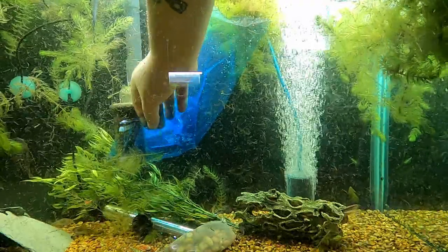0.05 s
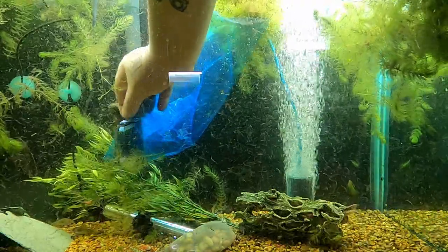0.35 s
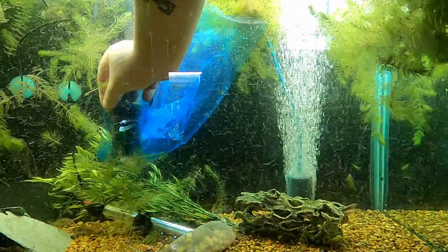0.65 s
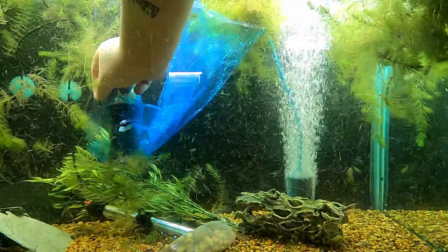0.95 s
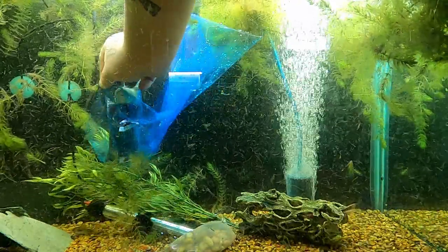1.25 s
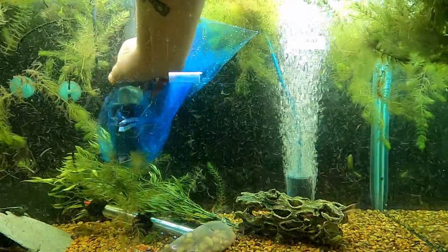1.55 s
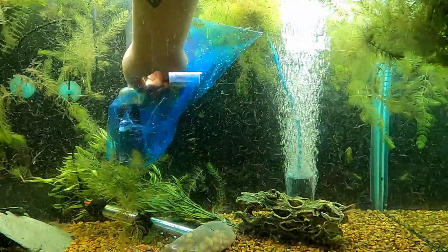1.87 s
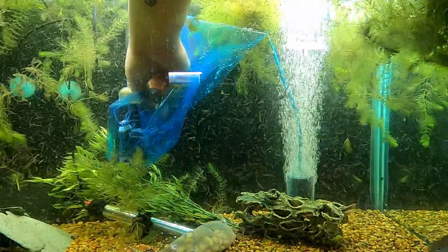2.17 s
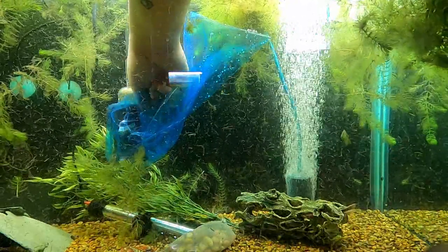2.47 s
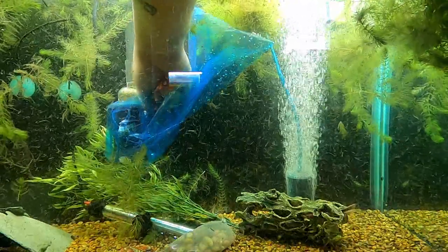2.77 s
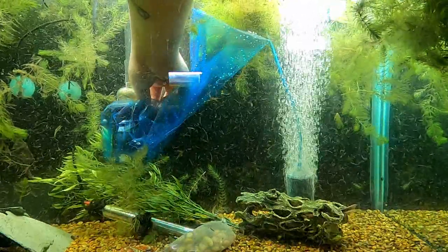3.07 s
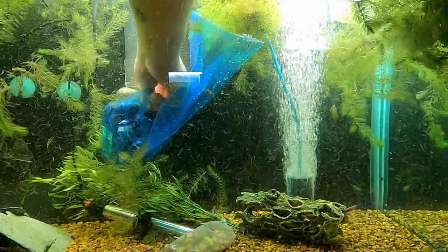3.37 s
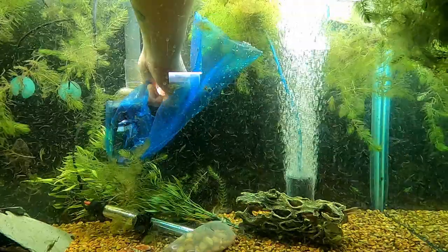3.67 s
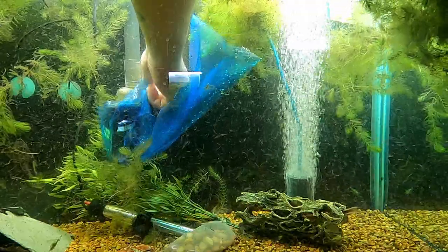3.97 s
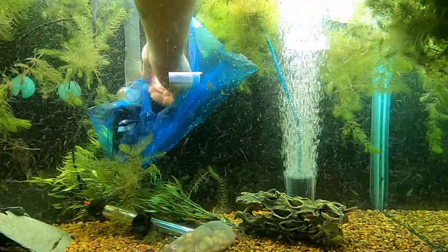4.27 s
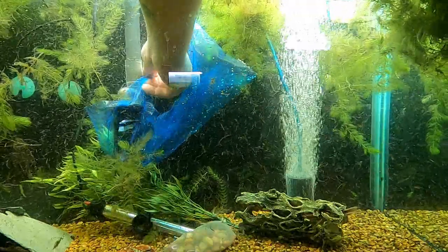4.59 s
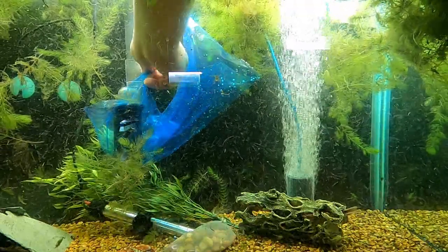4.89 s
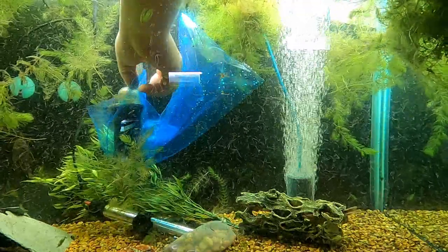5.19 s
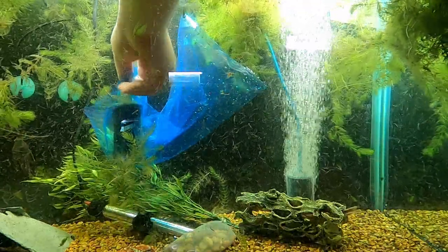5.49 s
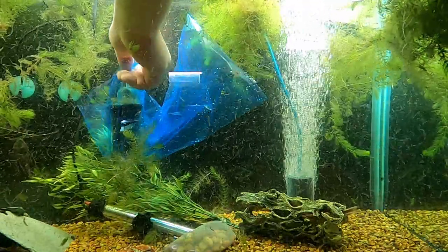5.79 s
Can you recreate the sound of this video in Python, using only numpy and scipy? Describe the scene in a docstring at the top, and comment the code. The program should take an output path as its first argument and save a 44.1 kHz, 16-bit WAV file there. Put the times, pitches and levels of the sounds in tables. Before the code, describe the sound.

An aquarium air stone bubbles steadily, rumbling and fizzing with small plinks, over a humming air pump and a few soft gurgles.

```python
"""Home aquarium in a small room

An air stone's column of bubbles rumbles in the tank and fizzes at the surface, where single bubbles
plink, films tick and little rafts collapse. The water gurgles softly around an arm moving in the tank.
Behind it a mains air pump buzzes, a slower motor throbs and the air line whistles faintly."""
import sys
import numpy as np
from scipy import signal
from scipy.fft import rfft, irfft, next_fast_len
from scipy.io import wavfile
from scipy.ndimage import map_coordinates

SR = 44100
rng = np.random.default_rng(int(sys.argv[2]) if len(sys.argv) > 2 else 0)


def master(y):
    """Save y as 16-bit WAV."""
    cut = np.clip(np.atleast_2d(y).T, -1, 1)
    pcm = np.round(cut * 32767)  # scale
    wavfile.write(sys.argv[1], SR, pcm.astype(np.int16))


N = 261954


def amp(db):
    """Decibels to gain."""
    return 10 ** (np.asarray(db) / 20)


def unit(x):
    """Scaled to rms 1."""
    return x / np.sqrt(np.mean(x ** 2) + 1e-20)


def along(curve, hz):
    """A curve of (freq_hz, value) points, read on a log frequency axis."""
    freqs, values = np.transpose(curve)
    return np.interp(np.log(hz + 1), np.log(freqs + 1), values)


def pan(pan_db):
    """Left and right gains for a level difference; positive is left."""
    return amp(np.multiply.outer([.5, -.5], np.atleast_1d(pan_db)))


def wobble(rate):
    """A smooth random curve, rate knots a second."""
    return map_coordinates(rng.standard_normal(int(N * rate / SR) + 4), [np.arange(N) * rate / SR])


def swell(peak_s, length_s):
    """A smooth hump from 0 to 1 and back."""
    return np.cos(np.pi * np.clip((np.arange(N) / SR - peak_s) / length_s, -.5, .5)) ** 2


def resonant(modes, hz):
    """Gain of (centre_hz, width_hz, level_db) resonances added in power."""
    return np.sqrt(sum(amp(2 * db) / (1 + ((hz - centre) / (0.67 * width)) ** 2) ** 2
                       for centre, width, db in modes))


def filtered(x, response):
    """x through an EQ given as gain against frequency."""
    size = next_fast_len(N + SR // 2)
    return irfft(rfft(x, size) * response(np.fft.rfftfreq(size, 1 / SR)), size)[..., :N]


def add(track, start_s, sound):
    """Mix a sound into a stereo track."""
    part = track[:, max(round(start_s * SR), 0):][:, :sound.shape[1]]
    part += sound[:, :part.shape[1]]


# How alike the tank sounds left and right: freq_hz, correlation
TANK_LIKENESS = [(40, 0.97), (250, 1), (600, 0.86), (1300, 0.75), (2800, 0.4), (6000, 0.17), (13000, 0.073)]
# Where each band of the tank sits, left minus right: freq_hz, pan_db
TANK_PAN = [(60, .5), (250, -0.5), (650, 2.5), (1300, 2.5), (2300, 3), (3900, 4.5), (5200, -1),
            (7700, -4.5), (9500, 4), (13000, 0)]

def placed(pair, colour):
    """Two unrelated signals, coloured and spread as the tank radiates: bass alike, treble apart."""
    def mid_side_gains(hz):
        angle = np.arccos(np.clip(along(TANK_LIKENESS, hz), -1, 1)) / 2
        return colour(hz) * np.array([np.cos(angle), np.sin(angle)])
    mid, side = filtered(pair, mid_side_gains)
    return unit(filtered(np.array([mid + side, mid - side]), lambda hz: pan(along(TANK_PAN, hz))))


def wash(colour):
    """A bed of coloured noise with the tank's stereo spread, rms 1."""
    return placed(rng.standard_normal((2, N)), colour)


# The small room's reverb time: freq_hz, t60_s
ROOM_DECAY = [(200, 0.17), (2000, 0.21), (12000, 0.11)]

def in_room(sound, pan_db, glass_db, room_db):
    """A sound with its own quick reflections from the glass and a room tail, in stereo."""
    hz, t, noise = signal.stft(rng.standard_normal((2, SR // 3)), SR, nperseg=256)
    tail = signal.istft(noise * amp(-60 * t / along(ROOM_DECAY, hz)[:, None]), SR, nperseg=256)[1]
    t = np.arange(tail.shape[1]) / SR
    glass = rng.standard_normal(tail.shape) * amp(-60 * t / 0.13) * (t > .002)
    path = amp(room_db) * tail / np.linalg.norm(tail[0])
    path += amp(glass_db) * glass / np.linalg.norm(glass[0])
    path[:, 0] += 1  # the direct sound
    return signal.fftconvolve(sound[None], path, axes=1) * pan(pan_db)


def ring(t, hz, t60, rise):
    """A bubble rings briefly, its pitch rising as it nears the surface."""
    tone = np.sin(2 * np.pi * hz * t * (1 + rise * t / t60))
    return tone * amp(-60 * t / t60) * (1 - np.exp(-t * hz / 2))


def spatter(t, hz, t60, count, spread, within_s):
    """A burst leaves small bubbles that ring just after it, scattered around its pitch."""
    delay, detune, strength = rng.random((count, 3)).T[:, :, None]
    since = np.maximum(t - within_s * delay, 0)
    pitches = hz * (1 + spread * (2 * detune - 1))
    return np.sum((.5 + .5 * strength) * ring(since, pitches, t60, rise=0.05), axis=0)


def swarm(rate, low_hz, high_hz, cycles, spread_db, samples=512):
    """Bubbles of random size and strength at random moments, rms 1."""
    when, pitch, strength = rng.random((int(rate * N / SR), 3)).T[:, :, None]
    hz = low_hz * (high_hz / low_hz) ** pitch
    gain = amp(-spread_db * np.log(1 - .98 * strength)) * hz
    grains = gain * ring(np.arange(samples) / SR, hz, cycles / hz, rise=.08)
    where = (when * N).astype(int) + np.arange(samples)
    return unit(np.bincount(where.ravel(), grains.ravel(), N)[:N])


def strays(rate, low_hz, high_hz, level_db, db_per_octave=-9, scatter_db=2.5):
    """Random cues (start_s, pitch_hz, level_db) for faint bubbles; the smaller, the weaker."""
    when, pitch, strength = rng.random((int(rate * N / SR), 3)).T
    octaves = pitch * np.log2(high_hz / low_hz)
    db = level_db + db_per_octave * (octaves - octaves.mean()) + scatter_db * (2 * strength - 1)
    return list(zip(when * N / SR, low_hz * 2 ** octaves, db))


def harmonics(partials, turns):
    """Sines at whole multiples of a rotation, each at its rms level and a random phase."""
    return sum(amp(db) * np.sqrt(2) * np.sin(2 * np.pi * (round(k) * turns + rng.random()))
               for k, db in partials)


def air_line(level_db=-75):
    """Air rushing through the tube rings in two narrow bands."""
    return amp(level_db) * wash(lambda hz: resonant([(3420, 80, -1), (3904, 70, 0)], hz))


# The slow motor's throb: harmonic, level_db
MOTOR_PARTIALS = [(1, -74), (3, -53.5), (4, -44), (6, -48.5), (8, -54), (9, -54), (12, -58), (13, -56.5)]

def motor(turn_hz=17.83):
    """A slow rotor throbs at multiples of its slightly drifting turning rate."""
    return harmonics(MOTOR_PARTIALS, turn_hz * np.arange(N) / SR + 0.013 * wobble(2.063))


# The pump's low mains hum: harmonic, level_db
PUMP_PARTIALS = [(1, -43.5), (2, -54), (3, -60), (4, -60.5), (5, -62.5), (8, -64.5), (10, -74.5),
                 (11, -74.5), (13, -85), (15, -83), (16, -77.5)]
# The housing resonances that voice its buzz: centre_hz, width_hz, level_db
HOUSING_MODES = [(1140, 40, -80), (1320, 200, -72.5), (2160, 50, -84), (2290, 50, -83.5), (2700, 30, -85),
                 (2890, 65, -74.5), (3240, 40, -82), (3385, 80, -77), (3565, 65, -74.5), (3715, 45, -76.5),
                 (3850, 50, -83), (3960, 40, -77.5), (4140, 40, -86), (6000, 1400, -96), (7800, 60, -94),
                 (8500, 120, -97), (9260, 200, -97), (10000, 90, -96)]

def pump(mains_hz=59.985):
    """The diaphragm strokes once per mains cycle: a hum, and a high buzz from the housing."""
    turns = mains_hz * np.arange(N) / SR
    hum = harmonics(PUMP_PARTIALS, turns)
    # the housing smears the push and the return over a few milliseconds, differently toward each side
    cycle = np.arange(2048) / 2048
    knock = amp(-18 * cycle) + 0.75 * amp(-18 * ((cycle - .5) % 1))
    rattle = rng.standard_normal((2, len(cycle))) + 1.08 * rng.standard_normal(len(cycle))
    lines = rfft(knock * rattle)
    hz = mains_hz * np.arange(lines.shape[1])
    lines = lines / abs(lines) * resonant(HOUSING_MODES, hz) * pan(along(TANK_PAN, hz))
    stroke = irfft(lines) * len(cycle) / np.sqrt(2)
    phase = turns + 0.00055 * wobble(3.01)
    buzz = np.array([np.interp(phase, cycle, side, period=1) for side in stroke])
    return hum + buzz


# Soft gurgles of large air pockets: start_s, pitch_hz, level_db, length_s, pan_db, warble_rad
AIR_POCKETS = [(2.905, 1238, -55.5, .05, 3, 0.67), (2.94, 1330, -58, 0.056, 3, .8),
               (4.137, 1430, -51.5, 0.075, 8, 0.51), (4.149, 289, -46, 0.05, 0, 1),
               (4.149, 379.4, -46, .06, 0, 1.3), (4.194, 1280, -55, .05, 4, 0.7),
               (4.287, 1280, -54, .04, 4, .8), (4.846, 700, -54, .07, -2, .4),
               (4.881, 605, -46, .052, 1, .35), (4.895, 806, -55.5, 0.057, 1, 1.1)]

def gurgles(rise=0.019):
    """Air pockets around the arm warble as they change shape and climb in pitch as they rise."""
    out, t = np.zeros((2, N)), np.arange(SR // 6) / SR
    for start_s, hz, db, length_s, pan_db, warble_rad in AIR_POCKETS:
        envelope = np.sin(np.pi * np.clip(t / length_s, 0, 1))
        warble = warble_rad * wobble(160)[:len(t)]
        tone = np.sin(2 * np.pi * hz * t * (1 + rise * t / length_s) + warble)
        add(out, start_s, in_room(amp(db) * envelope * tone, pan_db, glass_db=-7, room_db=-14))
    return out


PLINK_CYCLES, TICK_CYCLES = 68, 23.5  # periods to die away by 60 dB
BUBBLE_WIDTH = 0.58  # ticks and faint plinks take this share of the tank's pan at their pitch
# Sharp ticks of bursting films: start_s, pitch_hz, level_db
FILM_BURSTS = [(.306, 11500, -56), (.703, 11500, -64), (.91, 9000, -60), (1.084, 12000, -63),
               (1.51, 11800, -64), (1.768, 12100, -61), (1.936, 10100, -55.5), (2.108, 9000, -61),
               (2.512, 13200, -62.5), (2.635, 11200, -63), (2.7, 12200, -62), (2.796, 12000, -55),
               (2.998, 13500, -66), (3.112, 9650, -53.5), (3.523, 12300, -63), (4.41, 9400, -57),
               (4.426, 10300, -49), (4.429, 12000, -52), (4.774, 7100, -43), (4.915, 12500, -64),
               (5.534, 8300, -59)]

def ticks():
    """Bubble films snap with a bright, very short ring; fainter ones fall at random between them."""
    out, t = np.zeros((2, N)), np.arange(SR // 6) / SR
    faint = strays(rate=6, low_hz=7500, high_hz=13000, level_db=-65)
    for start_s, hz, db in list(FILM_BURSTS) + faint:
        t60 = TICK_CYCLES / hz
        tick = ring(t, hz, t60, rise=.05) + .5 * spatter(t, hz, t60, count=3, spread=.08, within_s=.012)
        pan_db = BUBBLE_WIDTH * along(TANK_PAN, hz)
        add(out, start_s, in_room(amp(db) * tick, pan_db, glass_db=5.5, room_db=6.5))
    return out


# The featured single bubbles: start_s, pitch_hz, level_db, pan_db
LOUD_PLINKS = [(.159, 2870, -47, 8), (.528, 4565, -52, -5), (.737, 6270, -54.5, 1), (.801, 2720, -52.5, -1),
               (.803, 4565, -53, -7), (.886, 1650, -49, 3), (.897, 6200, -49, -4), (.924, 5300, -52, -1),
               (.954, 3100, -52, 4), (.974, 6460, -52, -4), (.975, 3380, -48.5, 3), (.991, 3080, -49.5, 0),
               (1.119, 2780, -46.5, 4), (1.286, 1790, -42, 2), (1.296, 8000, -59.5, -6),
               (1.379, 7850, -60, -9), (1.668, 4390, -52, 5), (1.789, 2240, -53, 4), (2.219, 3100, -51, 3),
               (2.303, 4540, -49.5, -6), (2.451, 2420, -54, 4), (2.736, 1810, -48, -1),
               (2.768, 1720, -52, 1), (2.843, 3430, -45, 2), (2.854, 2760, -49, 3), (2.898, 6290, -56, -3),
               (3.104, 2260, -51, 2), (3.192, 3360, -49, 9), (3.255, 4350, -53, 0), (3.282, 6720, -56, -5),
               (3.844, 3500, -44.5, 2), (4.058, 7670, -55, -8), (4.25, 4300, -54, 3), (4.391, 2400, -52, 0),
               (4.455, 2160, -49.5, 2), (5.001, 7850, -60, -9), (5.055, 4000, -50, 0),
               (5.282, 4900, -50.5, 2), (5.295, 7000, -54, -5), (5.425, 5160, -50, 0),
               (5.579, 4280, -49, 3), (5.852, 3400, -48, 7)]

def plinks():
    """Single bubbles ring at the surface and leave a little spatter; faint strays fill the gaps."""
    out, t = np.zeros((2, N)), np.arange(SR // 6) / SR
    faint = [(start_s, hz, db, BUBBLE_WIDTH * along(TANK_PAN, hz))
             for start_s, hz, db in strays(rate=3.3, low_hz=2600, high_hz=7400, level_db=-62)]
    for start_s, hz, db, pan_db in list(LOUD_PLINKS) + faint:
        t60 = PLINK_CYCLES / hz
        plink = ring(t, hz, t60, rise=.06)
        plink += .32 * spatter(t, hz, t60 / 2, count=4, spread=.13, within_s=.035)
        add(out, start_s, in_room(amp(db) * plink, pan_db, glass_db=-4, room_db=-2))
    return out


# Rafts of small bubbles collapsing: start_s, pitch_hz, level_db, length_s, pan_db
RAFTS = [(0.887, 1600, -65, 0.034, 1), (.965, 7000, -74, 0.019, -6), (1.08, 4100, -66.5, 0.045, 3),
         (1.584, 4860, -71, .07, -1), (1.823, 2600, -68, 0.027, 7), (2.182, 3860, -67, .035, 4),
         (2.275, 5900, -71.5, 0.043, -3), (2.74, 1900, -67, .045, 2), (2.843, 3200, -67, 0.037, 3),
         (3.57, 5500, -75, .04, -2), (3.855, 880, -63, 0.023, 3), (3.858, 6000, -74, .025, -7),
         (4.115, 6650, -71, .025, -5), (4.144, 2750, -67, 0.065, 6), (4.15, 1390, -62.5, .065, 4),
         (4.397, 3500, -67, .05, 4), (4.775, 7250, -71, 0.011, -4), (4.995, 6400, -72, .012, -4),
         (5.04, 4100, -70, 0.036, 1), (5.278, 5100, -68, .025, 1), (5.422, 5300, -68, .012, 0),
         (5.53, 6200, -71, .015, -3), (5.575, 4200, -67, .035, 3)]

def splashes():
    """A raft of bubbles gives way: dozens pop within a few hundredths of a second."""
    out, t = np.zeros((2, N)), np.arange(SR // 6) / SR
    for start_s, hz, db, length_s, pan_db in RAFTS:
        pops = spatter(t, hz, TICK_CYCLES / hz, count=30, spread=0.19, within_s=length_s)
        pops = pops / np.linalg.norm(pops) * np.sqrt(length_s * SR)
        add(out, start_s, in_room(amp(db) * pops, pan_db, glass_db=-3, room_db=-1))
    return out


def froth(eq, grains, grain_db=-7):
    """Countless far bubbles merge into a wash; the nearer ones stand out as grains."""
    colour = lambda hz: amp(along(eq, hz))
    return unit(wash(colour) + amp(grain_db) * placed(grains, colour))


# Tone of the merging bubbles' trickle and of the smallest bubbles' fizz: freq_hz, gain_db
TRICKLE_EQ = [(200, -27), (600, 1), (850, -1), (1330, 0), (1650, -5), (2500, -8.5), (3700, -13),
              (4500, -15), (7000, -21.5), (14000, -40)]
FIZZ_EQ = [(1000, -48), (3300, 2.5), (4500, -0.5), (6200, -2), (7850, -6.5), (8200, -11.5), (9900, -10.5),
           (10800, -16), (12800, -18), (14500, -44)]
# Level rides as clusters surface together: peak_s, length_s, trickle_rise_db, fizz_rise_db
CLUSTERS = [(0.923, .3, 3, -2.5), (1.63, .16, -1, 0.5), (1.817, 0.25, 1, 0), (2.292, 0.22, 0.5, -0.5),
            (2.78, 0.25, 1, -1.5), (2.962, .2, 0.5, 0), (3.88, 0.18, 1.5, 0.5), (4.2, 0.45, 1.5, 0),
            (4.487, 0.18, 2, -3), (5.58, 0.22, 1, 0.5), (5.86, 0.13, -1.5, 1.5)]

def surface(trickle_db=-57, fizz_db=-66.5, crackle_db=-71):
    """Bubbles burst in surges: larger ones trickle, the smallest fizz, a few echo between the panes."""
    surge_db = sum(np.outer(rises, swell(peak_s, length_s)) for peak_s, length_s, *rises in CLUSTERS)
    trickle_rise_db, fizz_rise_db = surge_db + 0.71 * wobble(12)  # a chance flurry on top
    larger = np.array([swarm(rate=500, low_hz=700, high_hz=4560, cycles=45, spread_db=3.5, samples=1536)
                       for _ in range(2)])
    smallest = np.array([swarm(rate=550, low_hz=3500, high_hz=13250, cycles=96, spread_db=2.5)
                         for _ in range(2)])
    echoing = sum(in_room(swarm(rate=50, low_hz=1800, high_hz=7200, cycles=50, spread_db=2.6),
                          pan_db=0, glass_db=7, room_db=5) for _ in range(3))
    trickle = amp(trickle_db + trickle_rise_db) * froth(TRICKLE_EQ, larger)
    fizz = amp(fizz_db + fizz_rise_db) * froth(FIZZ_EQ, smallest)
    crackle = amp(crackle_db + fizz_rise_db) * placed(echoing[:, :N], lambda hz: amp(along(FIZZ_EQ, hz)))
    return trickle + fizz + crackle


# Low end of the column shaking water and glass: freq_hz, gain_db
RUMBLE_EQ = [(12, -30), (25, -9), (36, 0.5), (55, 1.5), (90, 0), (130, -5.5), (185, -11), (250, -10.5),
             (320, -20), (430, -25), (700, -35), (1000, -63), (2500, -80)]
# Resonances of the tank and of the air space under its hood: centre_hz, width_hz, gain_db
TANK_MODES = [(208, 14.5, -1.5), (227.6, 23, -3.5), (345, 33, -11.5), (403, 25, -13.5), (532, 31, -14),
              (714, 52, -19), (872, 20, -22), (1045, 60, -18.5)]
HOOD_MODES = [(490.3, 44, -2), (603, 38, -8)]
# Gulps of air that break the surface and swell the hood's note: peak_s, rise_db
AIR_GULPS = [(.19, 8.5), (.5, 5.5), (.92, 10.5), (1.32, 5), (1.52, 6), (1.74, 8), (2.08, 7.5), (2.48, 6.5),
             (2.72, 3.5), (2.95, 2.5), (3.2, 2), (3.86, 6), (4.26, 1), (4.63, 7.5), (4.94, 7), (5.17, 8.5),
             (5.4, 5), (5.8, 7)]

def bubble_column(rumble_db=-35.5, tank_db=-52, hood_db=-62.5, gulp_s=0.25):
    """Rising air churns the water: a deep rumble, a ringing tank, a hollow pulse under the hood."""
    rumble = wash(lambda hz: amp(along(RUMBLE_EQ, hz)))
    hollow = wash(lambda hz: resonant(HOOD_MODES, hz))
    burble = np.array([swarm(rate=160, low_hz=170.6, high_hz=1150, cycles=14.2, spread_db=2, samples=4096)
                       for _ in range(2)])
    walls = placed(burble, lambda hz: resonant(TANK_MODES, hz) / np.sqrt(hz + 1))
    gulp_db = sum(rise_db * swell(peak_s, gulp_s) for peak_s, rise_db in AIR_GULPS)
    waver_db = 0.78 * wobble(10)
    return amp(rumble_db + waver_db) * rumble + amp(tank_db) * walls + amp(hood_db + gulp_db) * hollow


def scene():
    """The full mix from in front of the tank, which stands slightly to the left."""
    bed = bubble_column() + surface() + pump() + motor()
    spots = gurgles() + plinks() + ticks() + splashes()
    return (bed + spots + air_line()) * pan(0.25)


def record(dry):
    """A steep low-pass takes off the very top of the mix."""
    return signal.sosfilt(signal.ellip(10, .1, 80, 14600, fs=SR, output="sos"), dry)


dry = scene()
out = record(dry)
master(out)
```